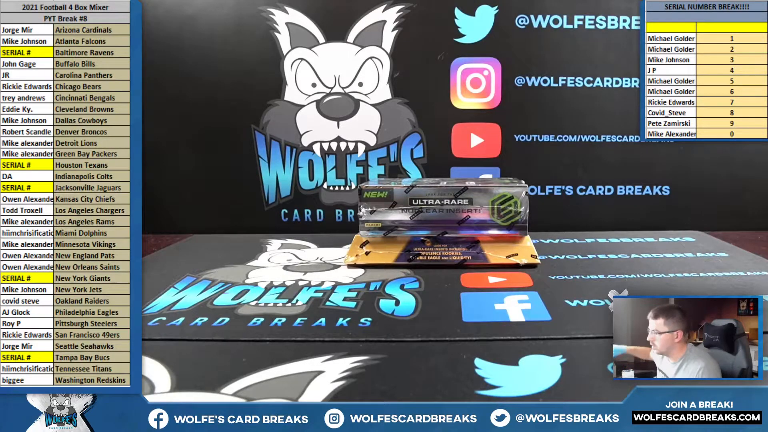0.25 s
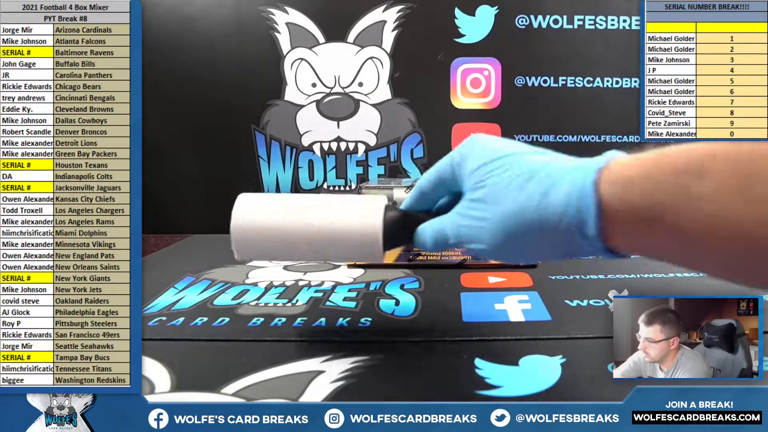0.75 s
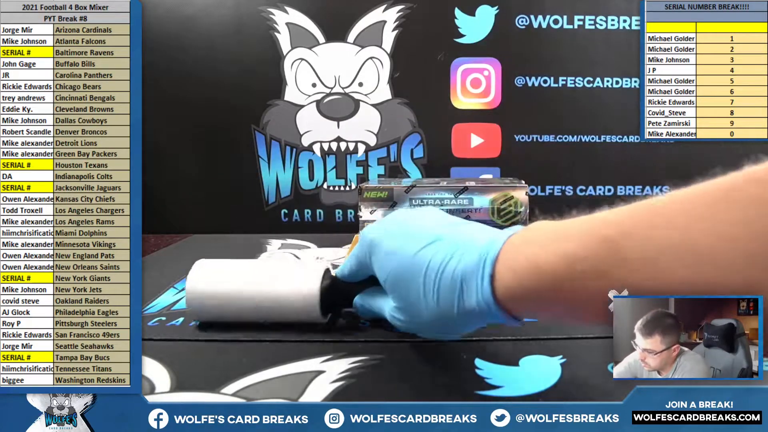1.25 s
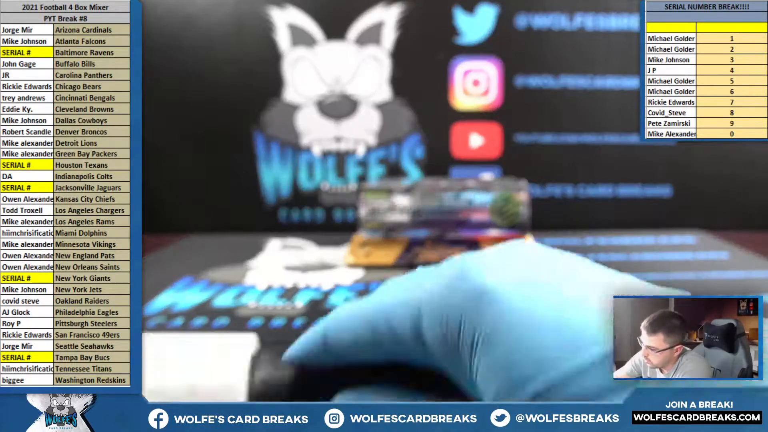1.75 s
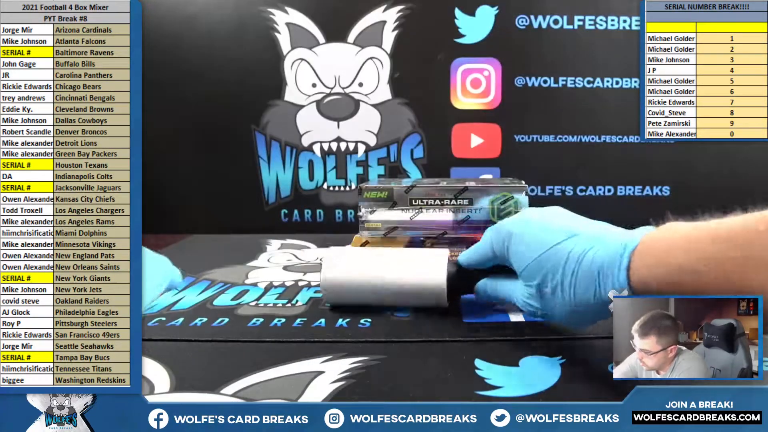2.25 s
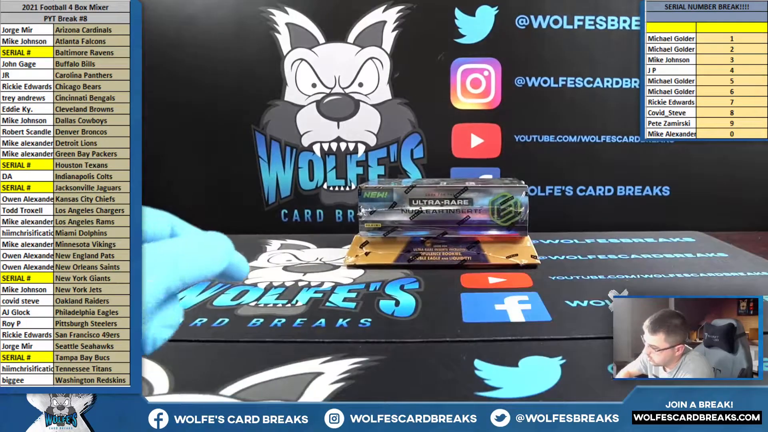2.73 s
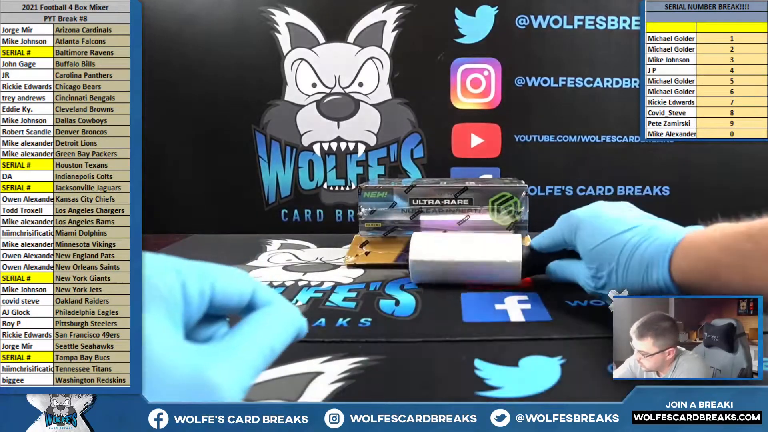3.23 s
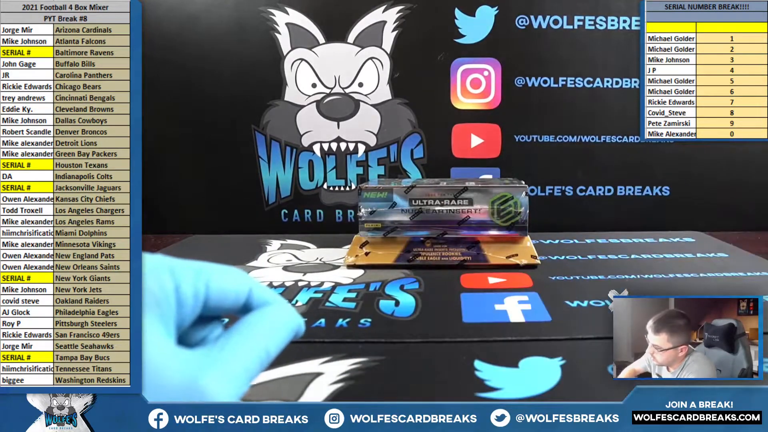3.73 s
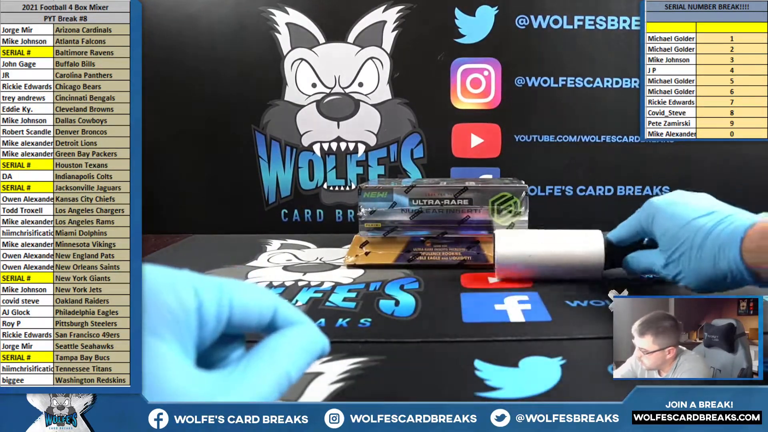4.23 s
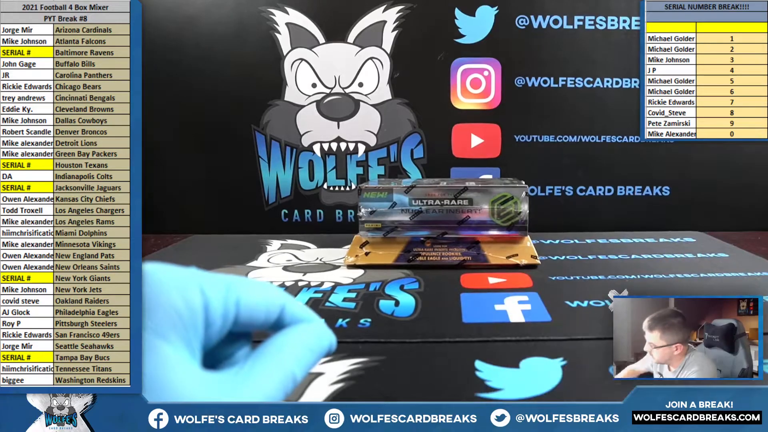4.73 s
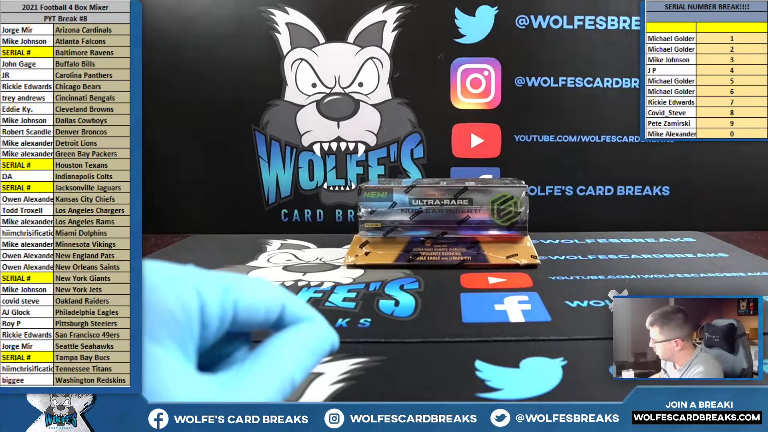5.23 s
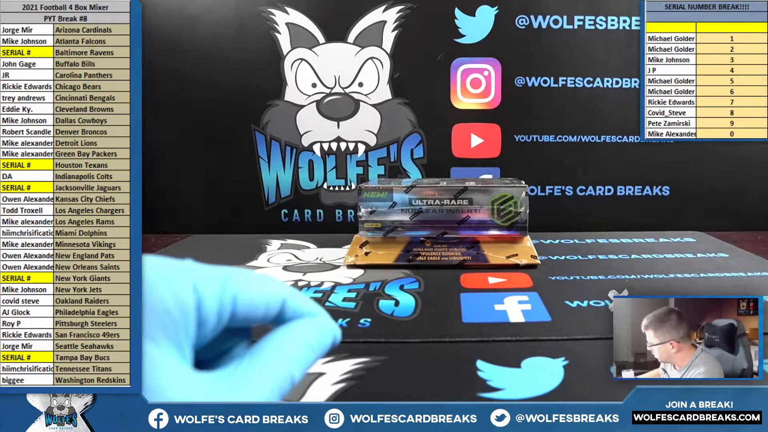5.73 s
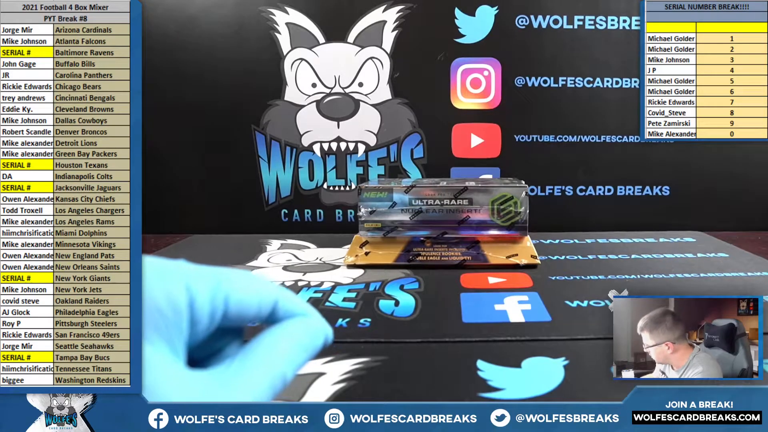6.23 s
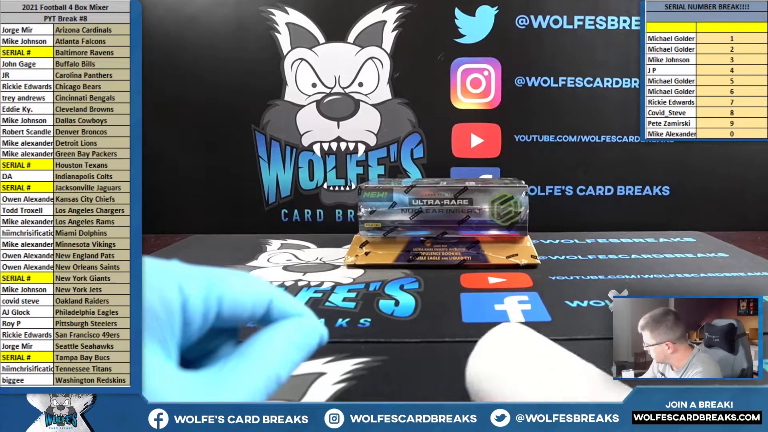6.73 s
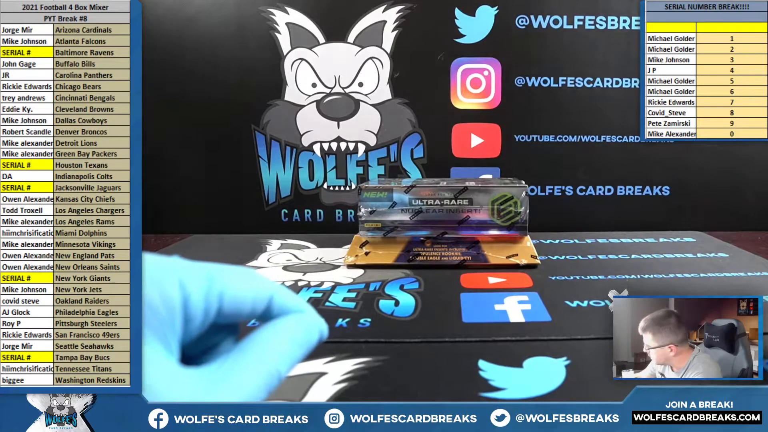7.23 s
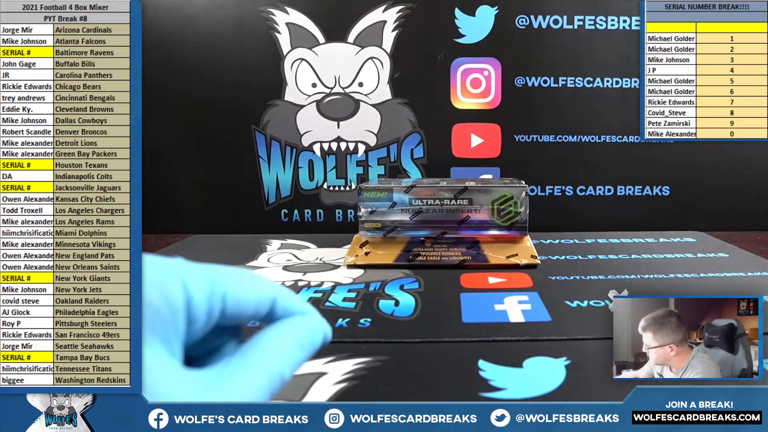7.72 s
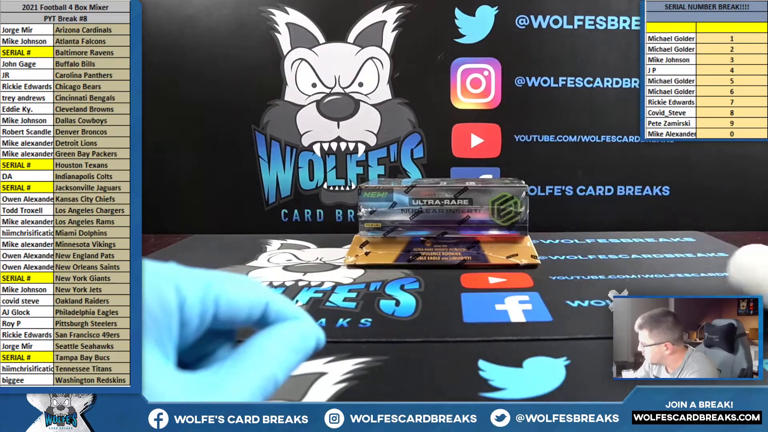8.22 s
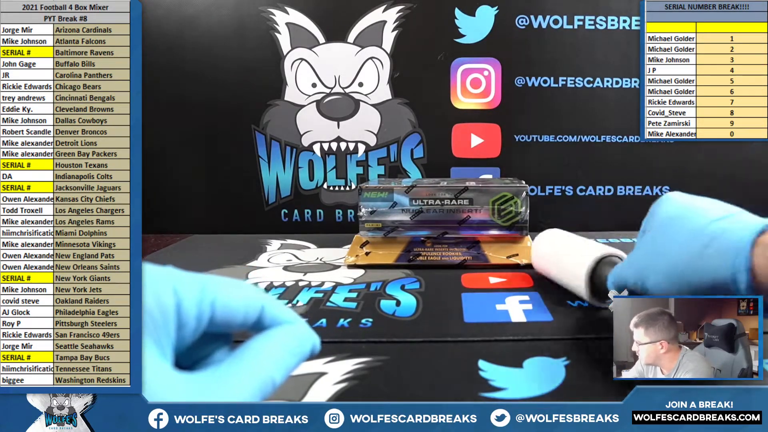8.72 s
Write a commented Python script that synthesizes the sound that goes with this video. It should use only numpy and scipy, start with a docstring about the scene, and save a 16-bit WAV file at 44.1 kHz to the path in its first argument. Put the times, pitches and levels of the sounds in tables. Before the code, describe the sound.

A sticky lint roller is pushed ten times over a rubber mat on a desk, close to the microphone in a small room. Each stroke gives a dense, crackly peeling hiss, with dull thumps and a low rumble from the desk. The loose plastic core clacks and the tape snaps as it lands or lifts. The later strokes are shorter and come faster, over a quiet computer fan hum.

```python
"""A sticky lint roller is pushed ten times over a rubber mat on a desk, close to a microphone in a small room.
Its tape peels off the mat as thousands of glue bonds snap, merging into a dense hiss. The uneven roll
drives the modes of the desk top, which thumps and rumbles, and the loose plastic core clacks on the
handle. The microphone stand sways with the desk; a computer fan hums quietly behind."""
import sys
import numpy as np
from scipy import signal
from scipy.fft import rfft, irfft, next_fast_len
from scipy.io import wavfile
from scipy.ndimage import uniform_filter1d

SR = 44100
rng = np.random.default_rng(int(sys.argv[2]) if len(sys.argv) > 2 else 0)


def int16_out(signal):
    """Quantize to a 16-bit WAV file."""
    q = np.round(np.clip(np.atleast_2d(signal).T, -1, 1) * 32767)
    wavfile.write(sys.argv[1], SR, q.astype(np.int16))


N = 395577
TIME = np.arange(N) / SR
HIT_TIME = TIME[:SR // 2]

# Pushes of the roller: (touch [s], full grip [s], top speed [s], lift [s], release time [s], hiss [dB],
# hiss drop at both ends [dB], treble [dB], relative rumble [dB], stand sway [dB],
# air gap resonance [Hz], skew of the roll to its path [0-1])
PUSHES = [(1.045, 1.142, 1.14, 1.598, 0.085, -43.5, 3, 0.5, -43, -50.5, 2420, .25),
          (2.075, 2.143, 2.53, 2.675, 0.095, -43, 5.5, 0.5, -41.5, -49, 3000, 0.35),
          (3.185, 3.205, 3.46, 3.747, 0.05, -44, 6.5, 0, -42.5, -52, 2730, .35),
          (4.237, 4.365, 4.6, 4.87, 0.058, -45, 4.5, 2, -43, -50.5, 2560, .4),
          (5.369, 5.376, 5.52, 5.682, 0.1, -45, 7.5, 0.5, -42, -43.5, 2700, 0.87),
          (6.055, 6.092, 6.195, 6.333, 0.11, -44.5, 4, 1, -37.5, -42, 3400, 1),
          (6.74, 6.759, 6.88, 7.012, 0.087, -44, 6, 3, -37, -47, 3430, 0.7),
          (7.382, 7.402, 7.459, 7.616, .086, -43.8, 3, 2.2, -41, -48, 3000, 0.6),
          (8.032, 8.049, 8.097, 8.19, 0.17, -49.5, -1, 5.5, -40, -53, 3000, 0.5),
          (8.702, 8.735, 8.905, 8.959, 0.076, -47.5, 4, 1.5, -42.5, -58, 3020, 0.66)]
# The roll lands or bumps over a ridge:
# (time [s], level [dB], shove pitch [Hz], upper modes [dB], lowest modes [dB])
BLOWS = [(0.947, -32.5, 204, 0, -6.5), (1.297, -17, 326, 2.5, -12), (1.532, -28, 193, -10, -6),
         (2.216, -34.5, 144, -11, 5), (2.346, -26.5, 146.3, -4, 6), (2.418, -26.5, 190, -14, -1),
         (2.598, -29, 238, -5, -4), (3.314, -35, 151, -25, 2), (3.431, -25, 150, -2.5, 6),
         (3.51, -28, 260, -7, -4.5), (3.696, -36, 146, 6.5, -7), (4.184, -34.5, 180, -9, 4),
         (4.465, -35.5, 150, -15, 3), (4.513, -23.5, 149, -10, -5), (4.649, -29.5, 238, -12, 8.5),
         (5.296, -29.5, 240, -8, -3), (5.439, -33.5, 190, -29, 0), (5.522, -31.5, 194, -8, -14),
         (6.04, -19.5, 250, 2.5, -1), (6.162, -30.5, 255, -12, -13), (6.233, -27.5, 193, -21, -17),
         (6.352, -33.5, 230, 3, -2), (6.713, -19, 280, -2, -12), (6.873, -23.5, 182, -7.5, -14),
         (7.333, -25, 203, -8, 0), (7.473, -27, 185, 3.5, 5.5), (8.005, -27, 186, -3, -3),
         (8.118, -33, 186, 9, 19), (8.686, -29, 192, -4.5, -5.5), (8.777, -38, 148, -17, 10)]
# Modes of the desk top: (frequency [Hz], level [dB], t60 [s])
DESK_MODES = [(68.4, -4.5, 0.96), (102.87, 3.5, 0.46), (150.6, -3, 0.28), (183, -5, 0.54),
              (217.7, -7.5, 0.28), (244.7, -2, 0.15), (269.5, 1, 0.28), (293, -15, 0.59), (334.5, -6, 0.57),
              (359.2, -3, 0.31), (428, -19, 0.084), (446, -18, 0.78), (482, -7, 0.095), (550, 0, 0.079),
              (607, 2, 0.081), (700, -11, 0.11), (770, -22, 0.28)]


def undb(db):
    """Amplitude ratio of a level in decibels."""
    return 10 ** (np.asarray(db) / 20)


def unit(x):
    """Normalisation to rms 1."""
    return x / np.sqrt(np.mean(x ** 2))


def unit_peak(x, size=220):
    """Normalisation of the loudest `size` samples to rms 1."""
    return x / np.sqrt(uniform_filter1d(x ** 2, size).max())


def fade(t60):
    """Exponential decay, 60 dB in t60 seconds, over the length of one hit."""
    return undb(-60 * HIT_TIME / t60)


def band(x, hz, kind, order=2):
    """Butterworth low- or high-pass filtering."""
    return signal.sosfilt(signal.butter(order, hz, kind, fs=SR, output="sos"), x)


def lows(x, hz):
    """Zero-phase low-pass filtering: run both ways, so that the remainder is a clean treble band."""
    forward = band(x, hz, "low", order=3)
    return band(forward[::-1], hz, "low", order=3)[::-1]


def colour(x, points):
    """Minimum-phase filtering through points of (frequency [Hz], gain [dB])."""
    size = next_fast_len(2 * len(x))
    hz, db = np.transpose(points)
    bin_hz = np.arange(size // 2 + 1) * SR / size
    gain_db = np.interp(np.log(bin_hz + 1), np.log(hz), db)
    cepstrum = irfft(np.log(undb(gain_db)), size)
    cepstrum[1:size // 2] *= 2  # folding the cepstrum makes the filter causal
    cepstrum[size // 2 + 1:] = 0
    return irfft(rfft(x, size) * np.exp(rfft(cepstrum)), size)[:len(x)]


def resonate(x, hz, width_hz, count=9):
    """A moving resonance, cross-faded between stationary ones from 1600 to 4400 Hz."""
    centres = np.geomspace(1600, 4400, count)
    bands = (signal.lfilter(*signal.iirpeak(f, f / width_hz, fs=SR), x) for f in centres)
    return sum(np.interp(hz, centres, share) * ringing for share, ringing in zip(np.eye(count), bands))


def walk(rate):
    """Slow random modulation: `rate` values a second, smoothed twice; rms 1."""
    hold = int(SR / rate)
    steps = np.repeat(rng.standard_normal(N // hold + 1), hold)
    return unit(uniform_filter1d(uniform_filter1d(steps, hold), hold)[:N])


def shot_noise(per_s, spread_db):
    """Shot noise: tiny clicks at random times, a few much larger than the rest; rms 1."""
    sizes = undb(spread_db * np.minimum(rng.exponential(size=N), 4.5))
    return unit((rng.random(N) < per_s / SR) * sizes * rng.choice([-1, 1], N))


def ring(modes, scatter_db=0, detune=0):
    """Superposition of damped modes; random shares stand for the changing place of contact."""
    chance = rng.standard_normal((len(modes), 2))
    return sum(undb(db + scatter_db * a) * fade(t60) * np.sin(2 * np.pi * hz * (1 + detune * b) * HIT_TIME)
               for (hz, db, t60), (a, b) in zip(modes, chance))


def add(track, s, sound):
    """Superposition of a sound on the track at time s."""
    start = max(int(s * SR), 0)
    track[start:start + len(sound)] += sound[:N - start]


def background(air_db=-59.5, hum_trim_db=-2.0):
    """Noise floor: broadband air noise under the wavering partials of fan and mains."""
    # Spectrum of the room's air: (frequency [Hz], gain [dB])
    air_spectrum = [(20, -19), (35, 9), (48, -8), (70, 0.5), (85, 5), (150, 1), (300, -1.5), (600, -6.5),
                    (1000, -12.5), (1600, -15.5), (2300, -22), (5000, -28), (15500, -35.5)]
    # Partials of fan and mains: (frequency [Hz], relative level [dB])
    partials = [(59.2, -55), (118.4, -66), (183.0, -69), (236.9, -67), (301.5, -71), (597.5, -73.5)]
    air = unit(colour(rng.standard_normal(N), air_spectrum))
    hum = sum(undb(db + 3.6 * walk(2.7)) * np.sqrt(2) * np.sin(2 * np.pi * hz * TIME + 0.54 * walk(4.3))
              for hz, db in partials)
    return undb(air_db) * air + undb(hum_trim_db) * hum


def room(x, t60=0.25, wet_db=-16, gap_s=0.00504):
    """Reverberation: the diffuse reflections of a small furnished room leave a short, dull tail."""
    reflections = rng.standard_normal(len(HIT_TIME)) * fade(t60) * (HIT_TIME > gap_s)
    tail = band(reflections, 6900, "low", order=1)
    return x + undb(wet_db) * signal.fftconvolve(x, tail / np.linalg.norm(tail))[:N]


def shaking(sway_hz=21.7, rest_db=-58.5, drone_db=-6):
    """Resonant build-up and decay: each push swings the stand and sets the desk's lowest modes droning."""
    sway_gain, drone_gain = undb(rest_db), 0
    for _, grips, _, lift, *_, rumble_db, sway_db, _, _ in PUSHES:
        before = np.maximum((grips + lift) / 2 - TIME, 0)
        after = np.maximum(TIME - lift, 0)
        # rise to mid-push and fall after the lift, with slopes in dB/s
        sway_gain = np.maximum(sway_gain, undb(sway_db - 38 * before - 14.5 * after))
        drone_gain = np.maximum(drone_gain, undb(rumble_db - 64 * before - 16.5 * after))
    sway = np.sqrt(2) * np.sin(2 * np.pi * sway_hz * TIME + 0.65 * walk(1.5))
    lowest_modes = ring([(65.8, -2, 1.0), (79.6, -1.5, 0.22), (101.5, -3.0, 0.64), (153.4, -17.5, 0.52)])
    drone = unit(signal.fftconvolve(rng.standard_normal(N), lowest_modes)[:N])
    return sway_gain * sway + undb(drone_db) * drone_gain * band(drone, 45.6, "high", order=4)


def axle_rasps():
    """Friction excitation: the roll rubs on its axle and drives one resonance of the hollow handle."""
    # Rubs: (middle [s], length [s], resonance [Hz], bandwidth [Hz], level [dB])
    rubs = [(1.225, 0.14, 1850, 446, -51.5), (1.7, .45, 1720, 400, -70), (1.72, 0.47, 3350, 400, -72),
            (4.365, 0.16, 2160, 220, -52.5), (5.493, 0.29, 2430, 350, -53.5), (7.45, 0.08, 3000, 900, -51),
            (8.07, 0.087, 2900, 900, -53.5)]
    out = np.zeros(N)
    for s, length, hz, width_hz, db in rubs:
        resonance = signal.iirpeak(hz, hz / width_hz, fs=SR)
        rub = signal.lfilter(*resonance, signal.lfilter(*resonance, shot_noise(3000, 1.5)))
        swell = np.cos(np.pi * np.clip((TIME - s) / length, -.5, .5))
        out += undb(db) * unit(rub) * swell
    return out


def core_clacks(chatter_db=-18, chatter_t60=0.4, rise_t60=0.0069):
    """Free vibration: the knocked hollow core swells into a brief ring and chatters on its axle."""
    # Knocks of the core on its axle: (time [s], level [dB], pitch [Hz])
    knocks = [(0.014, -36, 670), (0.985, -45.5, 730), (1.03, -48.5, 710), (1.351, -42, 686),
              (1.636, -47, 685), (2.012, -51, 665), (2.072, -36.5, 669), (2.226, -46, 670),
              (2.349, -32, 665), (3.111, -47.5, 685), (3.25, -37.5, 670), (3.325, -43, 677),
              (3.399, -41, 653), (3.445, -37, 674), (4.189, -34, 717), (4.363, -45, 666),
              (4.472, -39.5, 705), (4.512, -43, 665), (4.653, -44, 706), (5.327, -39.5, 638),
              (6.35, -46, 866), (7.433, -35.5, 780), (7.615, -39.5, 621), (8.079, -41, 750),
              (8.118, -40, 694), (8.314, -48.5, 615)]
    # Modes of the plastic core: (frequency [multiple of the pitch], level [dB], t60 [s])
    core_modes = [(.89, -19, 0.3), (1.001, 8.5, 0.036), (1.12, -6, 0.054), (1.5, -17.5, 0.09),
                  (2.17, -15, 0.019), (3.06, -7, 0.037), (4.03, -23, .03)]
    out = np.zeros(N)
    for s, db, hz in knocks:
        chatter = rng.standard_normal(len(HIT_TIME)) * fade(chatter_t60)
        modes = [(ratio * hz, share_db, t60) for ratio, share_db, t60 in core_modes]
        knock = (1 - fade(rise_t60)) * ring(modes, scatter_db=4.4, detune=0.02)
        tail = signal.fftconvolve(chatter, knock)[:len(knock)]
        add(out, s, undb(db) * (unit_peak(knock) + undb(chatter_db) * unit_peak(tail)))
    return out


def desk_thumps(lag_s=0.0011, shove_t60=0.013, judder_t60=0.24, judder_db=-5, focus_db=5):
    """Impact excitation: each blow shoves the desk top once, then the roll judders and the modes ring."""
    out = np.zeros(N)
    for s, db, hz, upper_db, lowest_db in BLOWS:
        shove = fade(shove_t60) * np.sin(2 * np.pi * hz * HIT_TIME)
        bounces = rng.standard_normal(len(HIT_TIME)) * fade(judder_t60)
        judder = signal.fftconvolve(bounces, shove)[:len(shove)]
        # modes near the pitch of the shove take most of it
        focus = [(hz / 2, 0), (hz * 0.92, focus_db), (hz * 2, 0)]
        modes = colour(ring(DESK_MODES, scatter_db=2.34, detune=0.01), focus)
        # judder and modes build up while the shove dies away
        after = (1 - fade(0.024)) * (undb(judder_db) * unit_peak(judder) + unit_peak(modes))
        blow = unit_peak(shove) + .9 * after
        tone = [(35, -16.0), (85, lowest_db), (170, 0.5), (350, -3),
                (560, upper_db), (900, upper_db - 5.5), (2000, upper_db - 13)]
        add(out, s + lag_s, -undb(db) * unit_peak(colour(blow, tone)))
    return out


def rolling(gain, hiss_gain, mat_db=-3):
    """Roughness excitation: the uneven roll shakes the desk, tumbles on the mat and buzzes its core."""
    tread = rng.standard_normal(N) * gain
    desk = unit(signal.fftconvolve(tread, ring(DESK_MODES, scatter_db=0.9, detune=0.0012))[:N])
    mat = unit(colour(tread, [(50, -1.5), (110, 1), (250, 3), (400, -17), (700, -14), (2000, -51)]))
    rumble = colour(desk + undb(mat_db) * mat, [(60, -7), (150, 3), (280, -2.5), (450, -11.5), (900, -5.5)])
    core_spectrum = [(60, -42), (200, 3.5), (450, 0.5), (680, -5), (950, -7.5), (1500, -3), (4000, -69)]
    core = unit(colour(rng.standard_normal(N), core_spectrum))
    return undb(3.5) * np.std(gain) * unit(rumble) + undb(-16.5) * hiss_gain * core


def tape_brushes():
    """Light adhesive contact: the barely touched tape gives a soft crackle that swells and fades."""
    # Touches, often just before the roll lands: (time [s], level [dB], swell [s], t60 [s])
    touches = [(0.0, -47.5, 0.0024, .22), (1.621, -63.5, .02, 0.8), (2.058, -55, 0.0044, 0.12),
               (3.12, -60.5, 0.0046, 0.29), (3.8, -76, 0.027, 1.0), (4.18, -52, .005, 0.1),
               (4.99, -64, 0.037, .3), (5.292, -53, 0.004, 0.28), (7.277, -66, .005, .1)]
    spectrum = [(500, -9), (1500, 0), (3000, 0), (5000, -0.5), (7200, 1.5), (10000, -14.5), (15000, -14)]
    crackle = unit(colour(shot_noise(9000, 2.7), spectrum))
    envelope = np.zeros(N)
    for s, db, swell_s, t60 in touches:
        swell = np.linspace(0, 1, int(swell_s * SR))
        add(envelope, s, undb(db) * np.concatenate([swell, fade(t60)]))
    return envelope * crackle


def tape_snaps(crack_t60=0.014, tail_t60=0.15, tail_db=-15, ring_db=8, rise_t60=0.0079):
    """Contact transients: tape meets or leaves the mat at once, ringing the plastic, with a papery tail."""
    # Tape smacks down or snaps free, or the handle ticks: (time [s], level [dB], treble [dB], ring [Hz])
    snaps = [(0.9448, -35.5, -4.5, 2550), (0.9854, -44.5, -6, 4500), (1.0374, -49.5, -4, 4210),
             (2.0075, -53, -1, 2160), (2.0729, -42, -9, 2200), (3.0943, -45.5, -7, 2780),
             (4.189, -38.5, -7.5, 2320), (4.513, -35.5, -28, 2160), (5.3034, -40.5, -9, 5170),
             (5.7817, -46, -0.5, 2100), (5.9, -57, -4, 4060), (6.0399, -39.5, -6, 3150),
             (6.3716, -40, -14, 2040), (6.462, -51, -9, 2040), (6.7118, -40, -12, 2500),
             (6.949, -40.5, 8, 3180), (7.3337, -42, -5.5, 3140), (7.587, -40.5, 4, 3850),
             (7.8395, -57, -15, 2030), (8.0047, -36.5, -9.5, 3220), (8.119, -38.5, -0.5, 1190),
             (8.2068, -40.5, 7, 4200), (8.397, -54.5, -4, 2130), (8.658, -60, 1, 2830),
             (8.6852, -34, -2.5, 2240)]
    # Spectrum of a snap: (frequency [Hz], gain [dB])
    snap_spectrum = [(500, 7.5), (1400, 0.5), (2300, 2.5), (3200, 1.5), (4200, -0.5), (5200, -2),
                     (8000, -3.5), (15000, -15)]
    out = np.zeros(N)
    for s, db, treble_db, hz in snaps:
        burst = rng.standard_normal(len(HIT_TIME)) * (fade(crack_t60) + undb(tail_db) * fade(tail_t60))
        burst *= 1 - fade(rise_t60)  # the contact spreads across the tape
        ringing = colour(burst, [(.87 * hz, 0), (hz, ring_db), (1.15 * hz, 0)])
        crack = unit_peak(colour(ringing, snap_spectrum), size=100)
        add(out, s - .0008, undb(db) * colour(crack, [(4500, 0), (7500, treble_db)]))
    return out


def arm_motion(touch_db=-12, release_db=-20, edge_s=0.0095, hardest_at=0.45):
    """Modulation by the arm: contact and speed shape the hiss, contact and pressure the rumble."""
    controls = np.zeros((6, N))
    for touch, grips, fastest, lift, release, db, slow_db, top_db, rumble_db, _, gap_hz, skew in PUSHES:
        contact_db = np.interp(TIME, [touch, grips], [touch_db, 0])
        contact_db += release_db * np.maximum(TIME - lift, 0) / release
        speed_db = -slow_db * np.interp(TIME, [grips, fastest, lift], [-1, 0, 1]) ** 2
        travel = np.interp(TIME, [touch, lift + release / 2], [0, 1])
        press_db = np.interp(travel, [0, hardest_at, 1], [-20.5, 0, -7])
        hiss_gain = undb(db + contact_db + speed_db)
        treble_db = top_db + 0.1 * contact_db  # a lighter touch dulls the hiss
        rumble_gain = undb(rumble_db + press_db + contact_db / 2)
        ring_hz = gap_hz * np.exp(-0.1 * (contact_db + speed_db))  # rises as the hiss falls
        end = lift + 2 * release
        on = np.interp(TIME, [touch - edge_s, touch, end, end + edge_s], [0, 1, 1, 0])
        controls += on * np.array([hiss_gain, treble_db, rumble_gain, ring_hz, travel, np.full(N, skew)])
    return controls


def bump(s, width_s):
    """Gaussian pulse of height 1 around time s."""
    return np.exp(-((TIME - s) / width_s) ** 2)


def tape_grip(hop_lead_s=0.0062, hop_s=0.0077, hop_db=-2.5, rip_s=0.016):
    """Uneven adhesion: the hiss dips as the roll hops before a thump and flares as a strip rips loose."""
    # Strips ripping loose in mid-push: (middle [s], hiss change [dB], treble change [dB])
    rips = [(1.21, -0.5, 4), (2.285, 0, 4), (3.365, 3.5, 1), (5.52, 2.5, 3), (6.087, 5, -2), (6.16, 3.5, 7),
            (6.2, 3.5, -2), (6.295, -1.5, 10), (6.83, 2.5, 5), (6.925, -0.5, 9), (7.43, -0.5, 5),
            (7.538, .5, 4.5), (8.06, -1, 3), (8.845, -0.5, 11.5), (8.885, 3.5, 8)]
    hops = sum(bump(s - hop_lead_s, hop_s) for s, *_ in BLOWS)
    flare_db, bright_db = sum(np.outer(gains_db, bump(s, rip_s)) for s, *gains_db in rips)
    return hop_db * hops + flare_db, bright_db


def tape_peel(gain, treble_db, gap_hz, travel, skew, near_s=0.001406, far_s=0.0026):
    """Adhesive fracture: thousands of glue bonds snap; a roll held askew tears more patches loose."""
    # Spectrum of peeling tape: (frequency [Hz], gain [dB])
    peel_spectrum = [(530, -20), (900, -11), (955, -12), (1290, -13.5), (1470, -8), (1580, -8.5),
                     (1750, -4.5), (1980, -4.5), (2200, -1.5), (3220, -1.5), (5980, -3.5), (7680, -2.5),
                     (10300, -7.5), (12400, -5.5), (15500, -36.5)]
    # Airy top of a roll running straight: (frequency [Hz], gain [dB])
    straight_tone = [(5000, 1), (12000, -4.5), (13500, 7), (15000, 22)]
    # Hollow tone of a roll held askew: (frequency [Hz], gain [dB])
    askew_tone = [(4200, -1), (5700, -3.5), (7500, 0), (12500, -5), (15000, 10.5)]
    bonds = shot_noise(16000, 3.3)
    patches = 0.45 * (0.43 + skew) * shot_noise(700, 4.2)
    hiss = (bonds + patches) * undb(0.72 * (1.5 + skew) * walk(90))
    # a reflection off the desk combs the hiss, and the comb slides down as the roll travels
    lag_s = near_s + (far_s - near_s) * travel
    reflection = .42 * np.interp(TIME - lag_s, TIME, hiss)
    hiss = colour(hiss + reflection, peel_spectrum)
    hiss = (1 - skew) * colour(hiss, straight_tone) + skew * colour(hiss, askew_tone)
    # the wedge of air between roll and mat resonates
    hiss = unit(hiss + 0.38 * resonate(hiss, gap_hz, width_hz=330))
    body = lows(hiss, 9600)
    return gain * (body + undb(treble_db) * (hiss - body))


def scene():
    """Superposition of roller and room at one microphone, the same in both channels."""
    hiss_gain, treble_db, rumble_gain, gap_hz, travel, skew = arm_motion()
    grip_db, bright_db = tape_grip()
    peel = tape_peel(hiss_gain * undb(grip_db), treble_db + bright_db, gap_hz, travel, skew)
    tape = peel + tape_snaps() + tape_brushes()
    roller = tape + rolling(rumble_gain, hiss_gain) + desk_thumps() + core_clacks() + axle_rasps()
    return np.tile(room(roller) + shaking() + background(), (2, 1))


def record(dry):
    """Band limiting: a steep elliptic low-pass cuts the treble above 15.8 kHz."""
    return signal.sosfilt(signal.ellip(10, .1, 80, 15800, fs=SR, output="sos"), dry)


dry = scene()
out = record(dry)
int16_out(out)
```